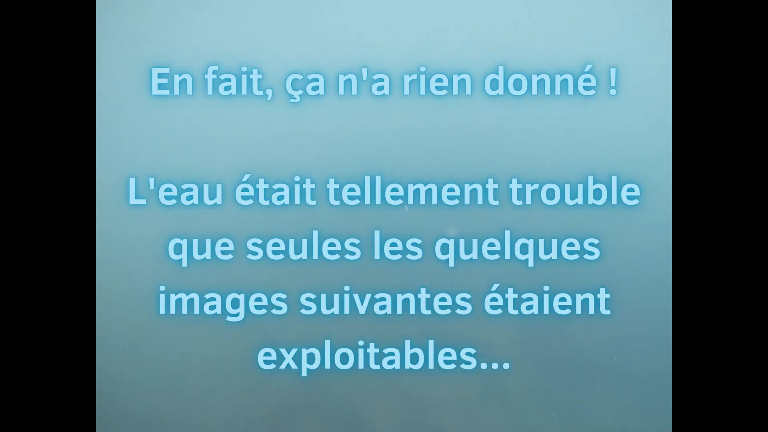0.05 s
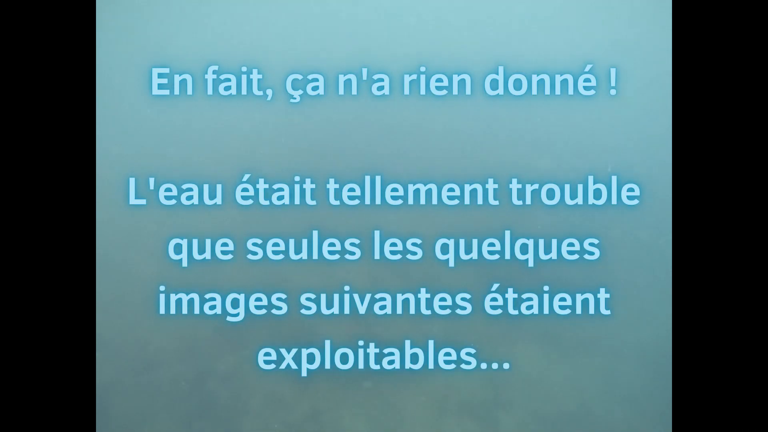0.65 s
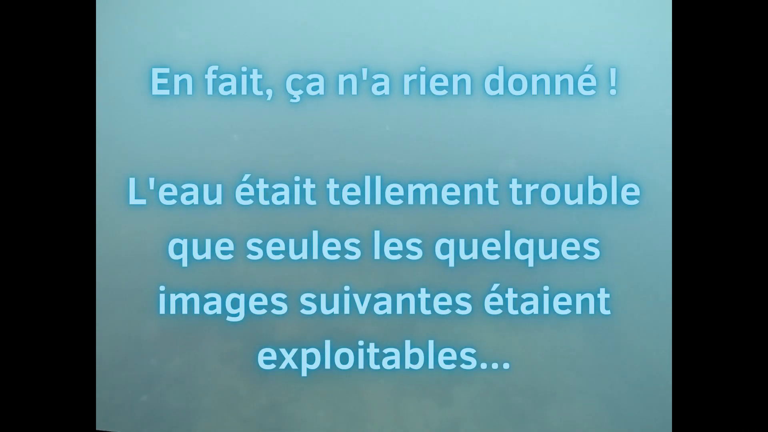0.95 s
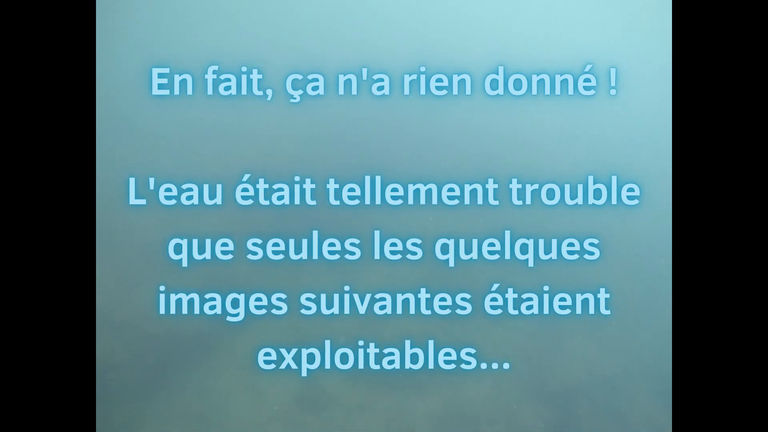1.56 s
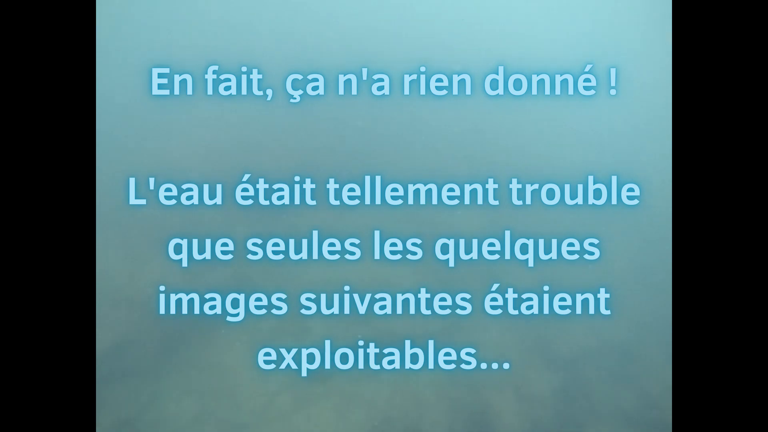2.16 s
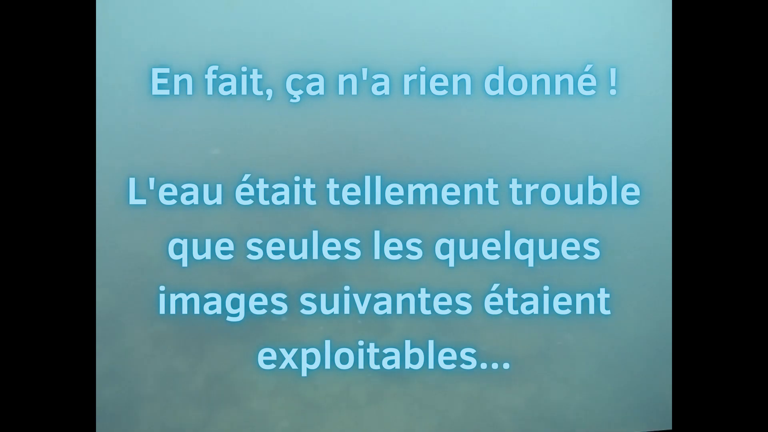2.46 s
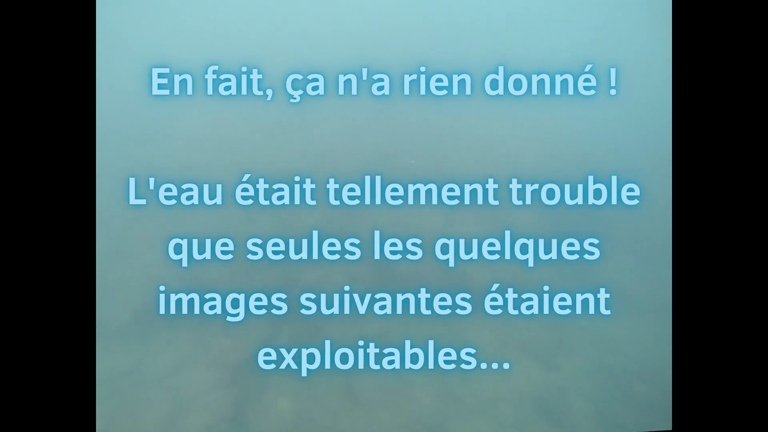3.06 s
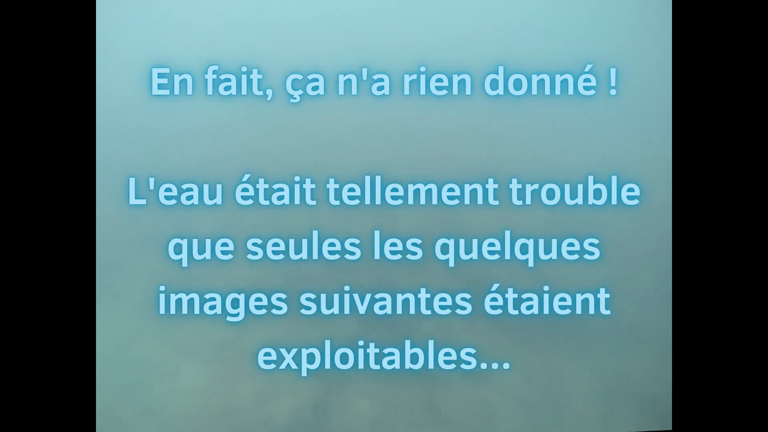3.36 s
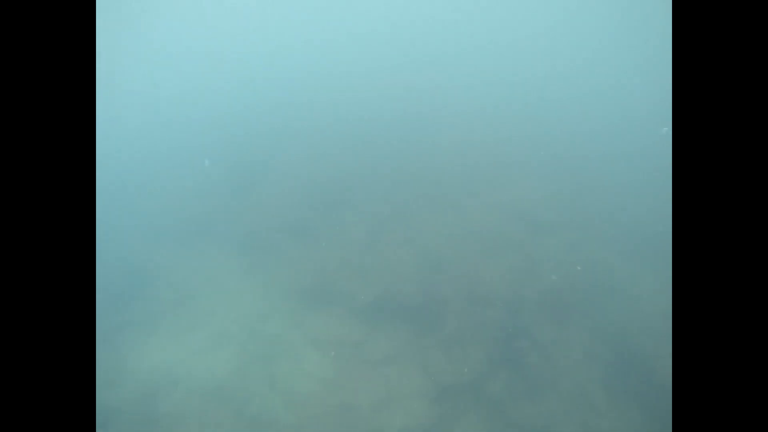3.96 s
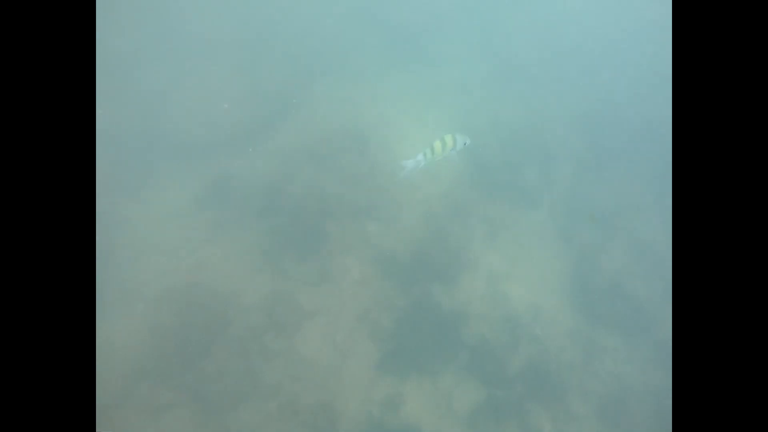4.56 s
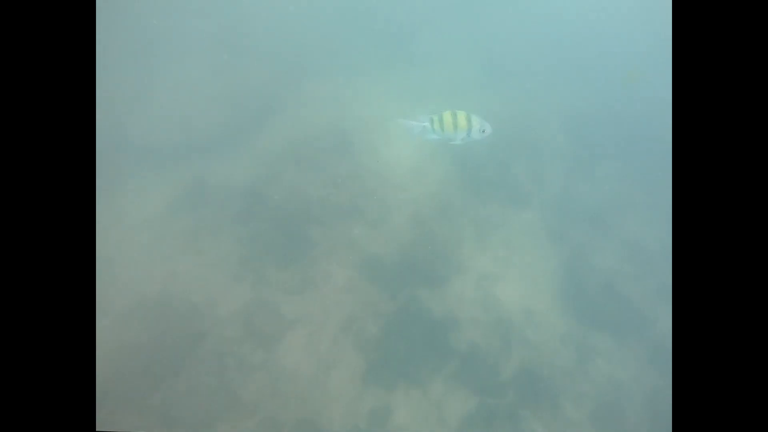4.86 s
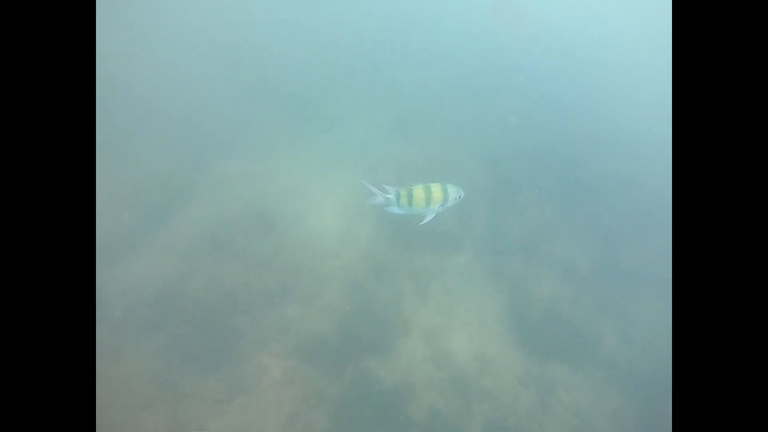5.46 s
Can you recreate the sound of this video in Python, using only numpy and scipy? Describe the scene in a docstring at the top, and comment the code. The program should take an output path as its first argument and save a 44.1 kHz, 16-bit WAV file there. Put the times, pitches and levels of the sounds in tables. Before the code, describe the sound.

Muffled underwater crackling of snapping shrimp over a low rumble of moving water, with small sloshes, thumps and bubbles.

```python
"""A camera in a waterproof case drifts over a shallow reef. From the start, snapping shrimp crackle near
and far and make the case ring, while moving water rumbles, thumps and sloshes against it and a few
bubbles ring. Midway, a hollow drone swells and dies away. At about 4.3 s comes a short silent cut.
A second shot fades in, mono and more muffled, with a stronger flow and the shrimp drawing nearer."""
import sys
import numpy as np
from scipy import signal
from scipy.fft import rfft, irfft, next_fast_len
from scipy.io import wavfile
from scipy.ndimage import uniform_filter1d, map_coordinates

SR = 44100
rng = np.random.default_rng(int(sys.argv[2]) if len(sys.argv) > 2 else 0)


def store_wav(level_fs):
    """Save 16-bit WAV to argv[1]."""
    pcm = np.round(np.clip(np.atleast_2d(level_fs), -1, 1) * 32767)
    wavfile.write(sys.argv[1], SR, pcm.T.astype(np.int16))


N = 247842
SHORT = 8192  # samples in one short sound
TIME, AGE = np.arange(N) / SR, np.arange(SHORT) / SR  # seconds into the scene, and into a short sound
HZ = np.fft.rfftfreq(SHORT, 1 / SR)
CUT_S, RESUME_S = 4.342, 4.411
LEAD_S = 0.003  # room for a click to build up before its peak

# The case wall bends, so its two microphone openings (ports) move out of step: f/Hz, left lag/rad
PORT_LAG = [(560, 0), (700, 1.3), (880, 3.8), (1200, 4), (1480, 1), (2120, .6), (2700, 3), (3300, 1.4),
            (4550, 3.1), (5150, 4.4), (5650, 7.8), (7500, 6.8), (8600, 5.3), (14000, 7)]
# The tone of water rumbling past the case: f/Hz, relative level/dB
RUMBLE_SPECTRUM = [(10, -5), (20, 6.5), (28, -2.5), (45, -2.5), (65, -18), (100, -15.5), (150, -27),
                   (220, -33.5), (400, -43.5), (900, -80.5), (2000, -120)]


def amp(db):
    """Turn decibels into a gain to multiply by."""
    return 10 ** (np.asarray(db) / 20)


def unit(x):
    """Scale a sound to an average (rms) size of 1."""
    return x / np.sqrt(np.mean(x ** 2) + 1e-20)


def along(points, hz):
    """Read between (f/Hz, value) points, with octaves evenly spaced."""
    f, values = np.transpose(points)
    return np.interp(np.log(hz + 1), np.log(f + 1), values)


def level(rows):
    """Turn (t/s, level/dB) rows into one gain per sample."""
    return amp(np.interp(TIME, *np.transpose(rows)))


def wobble(rate):
    """A smooth random curve through `rate` points a second."""
    return map_coordinates(rng.standard_normal(int(N * rate / SR) + 4), [TIME * rate])


def swell(start, end, rise, fall):
    """A gain that grows, holds from start to end, and dies away (all in seconds)."""
    return np.exp(-np.maximum(np.maximum((start - TIME) / rise, (TIME - end) / fall), 0))


def filtered(x, response):
    """Multiply each frequency in x by response(hz)."""
    size = next_fast_len(N + SHORT)
    return irfft(rfft(x, size) * response(np.fft.rfftfreq(size, 1 / SR)), size)[..., :N]


def noise(spectrum):
    """Noise of rms 1, shaped by (f/Hz, level/dB) points."""
    return unit(filtered(rng.standard_normal(N), lambda hz: amp(along(spectrum, hz))))


def treble(db, corner_hz=3900):
    """A filter that lifts or dulls the highs."""
    return amp(db * (1 - 1 / (1 + (HZ / corner_hz) ** 4)))


def add(track, s, sound):
    """Mix a sound into a track at s seconds."""
    part = track[..., max(round(s * SR), 0):][..., :sound.shape[-1]]
    part += sound[..., :part.shape[-1]]


def burst(spectrum):
    """Turn a spectrum into a stereo click whose loudest 2 ms have rms 1."""
    click = np.roll(irfft(spectrum), round(LEAD_S * SR), axis=1)
    return click / np.sqrt(uniform_filter1d(click.mean(0) ** 2, size=88).max())


def resonances(hz, width, db):
    """A filter that rings at the given pitches."""
    peaks = amp(db) / (1 + (2 * (HZ[:, None] - hz) / width) ** 2)
    cepstrum = irfft(np.log(np.linalg.norm(peaks, axis=1) + 1e-6))
    # keep one half, so the ringing comes after a hit and never before it
    cepstrum[1:SHORT // 2] *= 2
    cepstrum[SHORT // 2 + 1:] = 0
    return np.exp(rfft(cepstrum))


def stereo_case():
    """Each ringing pitch of the case reaches the two ports with its own strength and timing."""
    # where the case rings: f/Hz, width/Hz, left level/dB, right level/dB
    case_modes = [(560, 200, -50.5, -14.5), (713, 86, 0, -4), (868, 157, -0.5, 1.5), (1192, 70, 9, 2),
                  (1477, 740, 2, 4.5), (1710, 190, -1.5, 7), (1965, 320, -12.5, 4), (2715, 880, -3.5, -8.5),
                  (3220, 100, -3, -27), (3242, 340, -8, -6.5), (3960, 870, -18, -41.5),
                  (4660, 430, -27, -15), (5150, 930, -8, -45), (6230, 820, -24, -16),
                  (7810, 800, -20.5, -17.5), (8280, 2400, -27.5, -28), (10360, 1900, -29.5, -63),
                  (13000, 2100, -40, -42)]
    hz, width, left_db, right_db = np.transpose(case_modes)
    right = resonances(hz, width, right_db)
    left_phase = np.angle(right) - along(PORT_LAG, HZ)
    left = abs(resonances(hz, width, left_db)) * np.exp(1j * left_phase)
    return np.array([left, right])


def muffled_case():
    """The duller ring of the case in the second shot, alike on both sides."""
    # where the case rings: f/Hz, width/Hz, level/dB
    muffled_modes = [(580, 300, -18), (766, 280, 5), (1290, 180, -2.5), (1560, 280, 3), (2060, 230, -0.5),
                     (2620, 310, -4), (2810, 390, -4), (3630, 690, -13.5), (4830, 1700, -16.5),
                     (6130, 670, -13.5), (7700, 1260, -23), (9340, 940, -33)]
    return np.tile(resonances(*np.transpose(muffled_modes)), (2, 1))


def out_of_step(x):
    """A water sound reaches the left port later than the right."""
    return filtered(x, lambda hz: np.exp(np.outer([-1j, 0], along(PORT_LAG, hz))))


def babble(centre_hz, octaves, cycles, count, rise=0.1):
    """A random stream of tiny bubbles: each rings for some cycles and rises a little in pitch."""
    when, pitch, size = rng.random((count, 3)).T[..., None]
    turns = centre_hz * 2 ** (octaves * (pitch - .5)) * AGE[:SHORT // 8]
    life = turns / cycles
    loudness = -np.log(size) * life * np.exp(-4 * life)
    rings = loudness * np.sin(2 * np.pi * turns * (1 + rise * life))
    where = (when * N).astype(int) + np.arange(turns.shape[1])
    return unit(np.bincount(where.ravel(), rings.ravel(), N)[:N])


def gentle_flow(surge_db=1, surges_per_s=7.2):
    """Passing water rumbles in random surges; its eddies make left and right differ."""
    # strength of the flow: t/s, level/dB
    flow_levels = [(0, -43.5), (0.25, -34), (0.4, -45), (0.51, -39.5), (0.9, -43), (1.1, -42.5),
                   (1.3, -42.5), (1.7, -43), (2.15, -51), (2.5, -43.5), (2.85, -53.5), (3.3, -47),
                   (3.85, -50.5), (4.2, -44), (4.33, -47.5)]
    eddies = amp(-19) * np.outer([1, -1], noise(RUMBLE_SPECTRUM))
    surges = amp(surge_db * wobble(surges_per_s))
    return surges * level(flow_levels) * (noise(RUMBLE_SPECTRUM) + eddies)


def strong_flow(boost_db=2):
    """A stronger flow rumbles past the case, in mono."""
    # strength of the flow: t/s, level before the boost/dB
    flow_levels = [(4.43, -32.5), (4.5, -35.5), (4.57, -42.5), (4.72, -36), (4.83, -48), (5.0, -39.5),
                   (5.4, -40.5), (5.52, -37), (5.62, -28.5)]
    return amp(boost_db) * level(flow_levels) * noise(RUMBLE_SPECTRUM)


def drone(swell_db=-56, bed_db=-73.5, waver_db=3.5):
    """Passing water makes a faint, unsteady, hollow hum that swells once."""
    # tone of the hum: f/Hz, relative level/dB
    hum_spectrum = [(40, -92), (120, -8.5), (162, -2), (200, -10.5), (300, -36), (450, -46), (900, -61),
                    (2000, -120)]
    crest = amp(swell_db) * swell(start=2.47, end=3.09, rise=0.61, fall=0.45)
    waver = amp(waver_db * wobble(rate=11))
    hum = noise(hum_spectrum) + np.outer([.2, -.2], noise(hum_spectrum))
    return np.hypot(amp(bed_db), crest) * waver * hum


def gurgles():
    """Passing water gurgles softly with swells of tiny bubbles."""
    # the swells: t of crest/s, level/dB, rise/s, fall/s
    gurgle_rows = [(0.25, -63, 0.12, 0.7), (1.8, -56.5, 0.26, 0.16), (4.3, -59.5, 0.056, 0.029)]
    stirring = sum(amp(db) * swell(s, s, rise, fall) for s, db, rise, fall in gurgle_rows)
    return out_of_step(stirring * babble(centre_hz=645, octaves=0.51, cycles=14, count=1600))


def sloshes(spray=3, sputter_db=2.2):
    """Trapped air rings in short, sputtering swells, mixed with a hiss of spray."""
    # the sloshes: t of crest/s, level/dB, rise/s, fall/s, tilt to the highs/(dB per octave)
    slosh_rows = [(0.2, -46.5, 0.0049, 0.017, 10.5), (0.229, -45, 0.0063, 0.021, 7),
                  (0.290, -54, 0.016, 0.01, -24), (0.531, -51.5, 0.0089, 0.039, 6.5),
                  (1.02, -38, 0.0038, 0.0015, 4.5), (1.054, -46.5, 0.004, 0.0067, 9),
                  (1.342, -38, 0.00076, 0.016, 8), (1.61, -44, 0.0032, 0.011, 10.5),
                  (2.547, -41, 0.001, 0.0023, -8), (3.273, -44, 0.00098, 0.0035, -2),
                  (3.388, -49.5, 0.024, 0.032, 14), (3.485, -51.5, 0.0059, 0.091, 6.5),
                  (3.632, -55, 0.068, 0.047, 3.5), (4.474, -48.5, 0.0076, 0.014, 5.5),
                  (4.644, -26.5, 0.0035, 0.0024, 3), (4.668, -42, 0.018, 0.008, 0),
                  (4.956, -40, 0.0089, 0.025, -2.5), (4.983, -36.5, 0.0024, 0.0028, 7),
                  (5.146, -38, 0.022, 0.038, 1.5), (5.353, -41.5, 0.018, 0.016, 5.5),
                  (5.483, -49, 0.02, 0.013, 3), (5.572, -44.5, 0.019, 0.0098, 6.5)]
    # tone of a splash: f/Hz, relative level/dB
    splash_spectrum = [(60, -1.5), (200, 10.5), (400, -10.5), (570, 0.5), (920, -7), (1210, 0),
                       (1420, -3.5), (1620, -4), (2300, -21), (2700, -13), (4200, -32.5), (7000, -43.5),
                       (12000, -84)]
    out = np.zeros(N)
    froth = babble(centre_hz=970, octaves=3.105, cycles=12.2, count=3000)
    froth += spray * rng.standard_normal(N)
    froth *= amp(sputter_db * wobble(rate=170))
    for s, db, rise, fall, tilt in slosh_rows:
        colour = lambda hz: amp(along(splash_spectrum, hz) + tilt * np.log2(np.maximum(hz, 200) / 1000))
        shape = swell(s, s, rise, fall)
        slosh = shape * filtered(froth, colour)
        out += amp(db) * slosh * np.linalg.norm(shape) / np.linalg.norm(slosh)
    return out


def thumps(waver_octaves=0.11, rough_db=1.5):
    """Water pushes the case, which swings unevenly for a few low cycles; a gulp sinks in pitch."""
    # the pushes: t/s, f/Hz, peak level/dB, time to fade 60 dB/s, attack/s, glide/(octaves per s)
    push_rows = [(1.337, 115, -34.5, 0.086, 0.0041, 3), (2.531, 203, -33, 0.084, 0.041, -46.5),
                 (3.273, 109.4, -31, 0.073, 0.02, -2.5), (4.204, 125, -35, 0.045, 0.0081, -3),
                 (4.477, 53.4, -20.5, 0.069, 0.0017, 1.5), (4.643, 133, -21, 0.027, 0.00028, -75),
                 (4.666, 189, -24, 0.0084, 0.0021, -26), (4.74, 96, -27.5, 0.063, 0.0077, -4),
                 (4.967, 44, -24, 0.16, 0.0038, -3), (4.984, 177, -18, 0.029, 0.00027, -42),
                 (5.492, 29, -20, 0.3, 0.0039, 0)]
    out = np.zeros(N)
    bend, tremble = wobble(130), wobble(170)
    for s, hz, db, t60, attack, glide in push_rows:
        now = slice(round(s * SR), round(s * SR) + SHORT)
        age = AGE[:len(bend[now])]
        pitch_hz = hz * 2 ** (glide * age + waver_octaves * bend[now])
        loudness = amp(rough_db * tremble[now] - 60 * age / t60) * (1 - np.exp(-age / attack)) ** 2
        swing = loudness * np.sin(2 * np.pi * np.cumsum(pitch_hz) / SR)
        add(out, s, amp(db) * swing / abs(swing).max())
    return out


def bubbles(gain_db=-4.5, attack_s=0.00048, waver=0.042, rough_db=3):
    """Each bubble rings at a pitch set by its size, gliding and trembling as it changes shape."""
    # the bubbles: t/s, f/Hz, relative level/dB, time to fade 60 dB/s, glide/(octaves per s)
    bubble_rows = [(0.095, 579, -51, 0.72, 0.5), (0.125, 690, -40, 0.14, 9), (0.146, 1860, -33, 0.022, 2),
                   (0.195, 678, -31, 0.11, 3), (0.195, 966, -24, 0.056, -4), (0.195, 1190, -20, 0.098, 3.5),
                   (1.021, 1260, -19, 0.041, -10), (1.051, 660, -34.5, 0.027, -21),
                   (1.15, 2080, -38, 0.032, -6), (1.607, 2024, -21.5, 0.058, -1),
                   (1.64, 1440, -18.5, 0.017, -2), (1.937, 1760, -29, 0.018, 11),
                   (2.439, 702, -45.5, 0.064, -2), (2.6, 2070, -40, 0.033, 3), (2.667, 906, -41.5, .06, 10),
                   (3.055, 720, -47, 0.16, 0), (3.474, 1455, -35.5, 0.12, 7.5),
                   (3.509, 560, -35.5, 0.082, -13.5), (3.547, 1740, -53, 0.049, -2),
                   (3.597, 574, -42, 0.038, -11), (4.554, 804, -48.5, 0.17, -2.5),
                   (4.478, 840, -29.5, 0.017, -5), (4.642, 1207, -18, 0.028, -10),
                   (4.642, 1570, -20.5, 0.021, -11), (4.6419, 2930, -18, 0.01, -24),
                   (4.643, 626, -24, 0.0082, -32), (4.9813, 1680, -17.5, 0.0056, -18),
                   (4.984, 1233, -23.5, 0.028, 4), (5.156, 569, -25.5, 0.11, -4.5),
                   (5.473, 2655, -31.5, 0.017, -15), (5.477, 1630, -29, 0.032, 0)]
    out = np.zeros(N)
    bend, tremble = wobble(250), wobble(300)
    for s, hz, db, t60, glide in bubble_rows:
        now = slice(round(s * SR), round(s * SR) + SHORT)
        age = AGE[:len(bend[now])]
        pitch_hz = hz * 2 ** (glide * age) * (1 + waver * bend[now])
        fade = amp(db + gain_db + rough_db * tremble[now] - 60 * age / t60)
        onset = 1 - np.exp(-age / attack_s)
        add(out, s, onset * fade * np.sin(2 * np.pi * np.cumsum(pitch_hz) / SR))
    return out


def snap(case, smear_db, gap_s=0.00034, claw=0.48, low_cut_hz=1300, vary_db=2.5):
    """One snap's spectrum: a claw shuts, the cavity it makes in the water collapses, the case rings."""
    scatter = rng.standard_normal(SHORT) + 1.02 * rng.standard_normal((2, SHORT))
    # surface and seabed echo the snap, less for a shrimp in the open than for one in a crevice
    echoes = np.zeros((2, SHORT))
    shelter_db = rng.uniform(-5, 3)
    for db, t60 in (-9, 0.02), (-21, 0.12):  # near echo, far echo
        tail = scatter * amp(-60 * AGE / t60) * (1 - np.exp(-AGE / 0.012)) ** 2
        echoes += amp(db + shelter_db) * tail / np.linalg.norm(tail[0])
    # claw, collapse and a bounce off the rock come within about a millisecond
    delays = gap_s * np.cumsum([0, *rng.uniform(.3, 1.7, 2)])
    spike = np.array([claw, 1, -claw]) @ np.exp(-2j * np.pi * delays[:, None] * HZ)
    # rocks smear the spike
    smear = scatter * amp(-60 * AGE / 0.009) * (1 - np.exp(-AGE / 0.00049))
    smear /= np.linalg.norm(smear[0])
    direct = (spike + amp(smear_db) * rfft(smear)) / np.hypot(1, amp(smear_db))
    # each direction of arrival favours other pitches of the case
    log_pitches = np.linspace(np.log(1500), np.log(8000), 9)
    favour = amp(vary_db * np.interp(np.log(HZ + 1), log_pitches, rng.standard_normal(9)))
    low_cut = 1 / np.sqrt(1 + (low_cut_hz / (HZ + 1)) ** 6)
    return (direct + rfft(echoes) * treble(-8)) * favour * case * low_cut


def colony(case, count, tick_db, low_hz, high_hz, fizz_bright_db, fizz_db=-8, db_per_octave=-2):
    """Small, smeared ticks at random moments over the fizz of countless distant shrimp."""
    ticks = np.zeros((2, N))
    for when, size, cavity in rng.random((count, 3)):
        size_db = 4.5 * min(-np.log(size), 2.3)
        pitch_hz = low_hz * (high_hz / low_hz) ** cavity  # the cavity's size sets the pitch
        band = 1 / np.sqrt(1 + (1.21 * np.log2((HZ + 1) / pitch_hz)) ** 6)
        gain = amp(tick_db + size_db + db_per_octave * np.log2(pitch_hz / low_hz))
        add(ticks, when * N / SR, gain * burst(snap(case * band, smear_db=10)))
    spikes = rng.standard_normal(N) * (rng.random(N) < 1500 / SR)  # about 1500 a second
    distant = unit(spikes) + 0.79 * rng.standard_normal((2, N))
    ring = np.roll(irfft(case * treble(fizz_bright_db)), SR // 1000, axis=1)
    fizz = signal.fftconvolve(distant, ring, axes=1)[:, :N]
    return ticks + amp(fizz_db + 1.3 * wobble(5.07)) * fizz / fizz.mean(0).std()


def near_shrimp(case, start, end, gain_db=-1.5, close_db=-37.5, rise_s=0.0005):
    """The nearest shrimp snap one by one: some are dull knocks, some thin ticks, some both."""
    # the snaps: t/s, then relative level/dB in each of four bands, from low to high
    snap_rows = [(0.0875, -52.5, -56.5, -55, -55), (0.1862, -45, -40.5, -51.5, -63),
                 (0.2666, -49, -77, -55.5, -58), (0.3361, -49, -60.5, -56, -58),
                 (0.3633, -53.0, -54, -56, -57), (0.375, -64, -69.0, -66, -58),
                 (0.475, -48.0, -54, -70, -51.5), (0.5213, -64, -75.0, -53, -63.5),
                 (0.5658, -43, -42.5, -45.5, -52), (0.5976, -37, -51.0, -53, -56.5),
                 (0.628, -42, -41, -54, -56), (0.6625, -42, -44.5, -50, -49),
                 (0.6871, -39.5, -42, -49, -64), (0.738, -39.5, -44, -55, -62),
                 (0.7997, -66, -52, -54.0, -52.5), (0.8494, -61, -66, -50.5, -58),
                 (0.8865, -37.5, -40, -47, -45.5), (0.9247, -46, -40, -46.5, -51),
                 (0.9368, -66.0, -68.5, -57, -57), (0.949, -55, -48.5, -50, -65),
                 (0.9771, -43, -55, -48.5, -68.5), (0.9853, -67.5, -63.5, -55.0, -60),
                 (1.0585, -53, -50, -46.5, -48), (1.0728, -33, -47.5, -41, -60),
                 (1.1065, -45, -52.5, -65, -51), (1.127, -29, -32.5, -38.5, -43),
                 (1.17, -52, -66, -46.5, -65.0), (1.255, -42.5, -48, -49.5, -65),
                 (1.2698, -38, -59, -68, -83.5), (1.3047, -57, -48, -57.0, -72),
                 (1.315, -48, -57.0, -53, -64), (1.341, -40.5, -37, -44, -65), (1.3473, -50, -56, -34, -52),
                 (1.4068, -73, -57, -47, -58), (1.4293, -48, -47.5, -44.5, -56),
                 (1.4392, -70, -70, -63, -69), (1.4841, -47, -55, -52.0, -71),
                 (1.5136, -46, -54, -46.5, -58), (1.533, -69, -72, -49, -60.0),
                 (1.5584, -61, -66, -49, -60), (1.6293, -46, -61, -50.5, -57),
                 (1.6389, -26.5, -36, -38.5, -45.5), (1.7205, -52, -48.5, -50, -48),
                 (1.8225, -70, -80, -51, -60), (1.8342, -58.5, -59, -55, -58.0),
                 (1.885, -44, -46.5, -50, -49), (1.9018, -59.5, -63.0, -50.0, -62.5),
                 (1.9244, -42.5, -47.5, -55.5, -60.0), (1.9676, -45.5, -48, -41, -60),
                 (1.9835, -54, -64, -44.5, -63), (2.027, -35.5, -61, -53, -58),
                 (2.036, -43.5, -52.0, -62.5, -68.0), (2.0412, -48, -56.0, -56.0, -59.0),
                 (2.056, -50, -50, -45, -64), (2.07, -25.5, -34.5, -30, -54), (2.0853, -45, -45, -49, -61),
                 (2.0967, -54, -47, -50, -69.5), (2.1693, -71, -69, -54, -55.5),
                 (2.186, -54, -68, -49, -65), (2.2211, -40.5, -40, -40.5, -50.0),
                 (2.2333, -69, -72.0, -58, -61), (2.258, -42.5, -48, -49, -54),
                 (2.2768, -52, -48, -50.5, -49.5), (2.2984, -48.5, -46, -53, -60),
                 (2.3104, -31.5, -39.5, -46.5, -61), (2.346, -40, -44, -43, -62),
                 (2.366, -32, -47.5, -60.5, -59), (2.3867, -60, -59, -55, -49.5),
                 (2.4279, -52, -46, -42, -64), (2.4381, -45, -61.0, -66, -51),
                 (2.4486, -65, -59, -57, -61.5), (2.486, -52.5, -58, -55, -70),
                 (2.5314, -44.5, -45.0, -50.5, -65), (2.562, -45, -48.5, -64, -69),
                 (2.629, -52.5, -58.0, -50.0, -60.5), (2.6427, -48, -56.0, -58, -65.5),
                 (2.6701, -37.5, -48.0, -43.5, -53), (2.6914, -35.5, -43, -39, -53),
                 (2.7149, -49.5, -52, -58, -59), (2.7395, -23, -32.5, -32, -38),
                 (2.775, -69, -56, -53.0, -62.0), (2.7863, -35.5, -38, -50, -66),
                 (2.8507, -42.5, -43.5, -51, -45), (2.861, -68, -56.0, -52, -62.5),
                 (2.893, -60, -65, -55, -61.5), (2.8993, -68, -59, -56, -65),
                 (2.9196, -44.5, -42, -39, -55), (2.9543, -44.5, -51, -54, -79.5),
                 (3.0366, -47.5, -58, -45, -61), (3.0647, -65.0, -59, -58.5, -68),
                 (3.0839, -46, -49.5, -54, -71), (3.1322, -49, -44, -43.5, -72),
                 (3.1585, -66, -48, -58.0, -67), (3.1922, -49, -54, -71, -75),
                 (3.214, -46.5, -65, -45.0, -60.5), (3.2684, -40.5, -53.0, -54, -69.5),
                 (3.2763, -50.0, -51.0, -47.0, -58.0), (3.298, -54.5, -49, -41.0, -49),
                 (3.323, -54, -49, -51.0, -68), (3.333, -59, -54, -55, -59.5),
                 (3.3608, -53, -53, -51.0, -50.0), (3.384, -46, -48, -65, -67),
                 (3.3989, -51, -53.0, -54.0, -70), (3.4416, -49, -52, -49.5, -47.0),
                 (3.4572, -50, -65.0, -54, -52), (3.5773, -49.5, -49, -46, -59),
                 (3.5943, -38.5, -48.5, -41.5, -65.0), (3.6085, -48, -54, -56.0, -58.5),
                 (3.66, -30, -49, -55, -60), (3.6689, -43.5, -55.0, -53, -66),
                 (3.7232, -49.0, -52.5, -61, -72), (3.7354, -55, -57, -52, -59),
                 (3.7807, -60, -71, -53, -59), (3.7918, -40, -49.0, -62.0, -65),
                 (3.8121, -44.5, -50, -64, -71), (3.8258, -61, -57, -53.0, -68.5),
                 (3.8365, -47, -50, -49, -61.0), (3.85, -38.5, -36, -46.5, -57.0),
                 (3.9197, -31, -42.5, -65, -72), (3.9878, -24, -27, -36.5, -37),
                 (4.016, -43.5, -61, -56.5, -55), (4.0372, -25, -36, -59, -68),
                 (4.0977, -50, -52, -53, -63), (4.129, -40, -44, -52, -53.5),
                 (4.2206, -30, -31.5, -42, -54), (4.267, -52, -40, -66, -60.0),
                 (4.2834, -52, -48, -51, -59), (4.3063, -50.5, -51, -42.5, -54.5),
                 (4.571, -82, -63.5, -58.5, -91), (4.689, -59, -58.5, -59.0, -78.0),
                 (4.7051, -77, -61, -50, -78), (4.7875, -44.5, -46.5, -43.5, -57.5),
                 (4.8465, -61.5, -57.5, -54.5, -79), (5.04, -55, -56, -54.0, -71.0),
                 (5.168, -62.0, -67, -49.5, -75), (5.23, -58.0, -54, -51, -68), (5.302, -57, -54, -55, -66),
                 (5.442, -61, -72.0, -54.0, -55.5), (5.4746, -38.5, -35, -45, -52.5),
                 (5.5165, -49.0, -43.5, -77, -66)]
    # where the four bands meet: f/Hz
    band_edges = [2300, 3900, 7000]
    out = np.zeros((2, N))
    below = 1 / (1 + (HZ / np.array(band_edges)[:, None]) ** 16)
    bands = np.diff(below, axis=0, prepend=0, append=1)
    for s, *band_db in snap_rows:
        if start < s < end:
            # a snap weaker than close_db is more smear than spike
            heard = snap(case, smear_db=1.1 * (close_db - max(band_db)))
            click = sum(amp(gain_db + db) * burst(heard * band) for db, band in zip(band_db, bands))
            add(out, s + rise_s - LEAD_S, click)
    return out


def first_shot(reef_db=-53, dip_db=2, reach_s=0.86):
    """A lively reef in stereo; the colony starts a little farther off and is soon reached."""
    case = stereo_case()
    nearness = amp(reef_db - dip_db * np.exp(-TIME / reach_s))
    crackle = colony(case, count=420, tick_db=-3.5, low_hz=1530, high_hz=11500, fizz_bright_db=9.5)
    return nearness * crackle + gentle_flow() + drone() + gurgles() + near_shrimp(case, 0, CUT_S)


def second_shot(reef_db=-66, approach_db_per_s=9):
    """A duller, farther reef in mono, drawing nearer under a stronger flow."""
    case = muffled_case()
    nearness = amp(reef_db + approach_db_per_s * (TIME - RESUME_S))
    crackle = colony(case, count=380, tick_db=-4, low_hz=3000, high_hz=7500, fizz_bright_db=11)
    return strong_flow() + (nearness * crackle + near_shrimp(case, RESUME_S, N / SR)).mean(0)


def scene():
    """The first shot stops dead and the second fades in; water bubbles, thumps and sloshes in both."""
    water = bubbles() + thumps() + sloshes()
    fade_out = np.clip((CUT_S - TIME) / 0.00086, 0, 1)
    fade_in = np.clip((TIME - RESUME_S) / 0.067, 0, 1)
    return fade_out * (first_shot() + out_of_step(water)) + fade_in * (second_shot() + water)


def record(dry):
    """The camera cuts off the highs above 14500 Hz."""
    return filtered(dry, lambda hz: 1 / (1 + (hz / 14500) ** 60))


dry = scene()
out = record(dry)
store_wav(out)
```